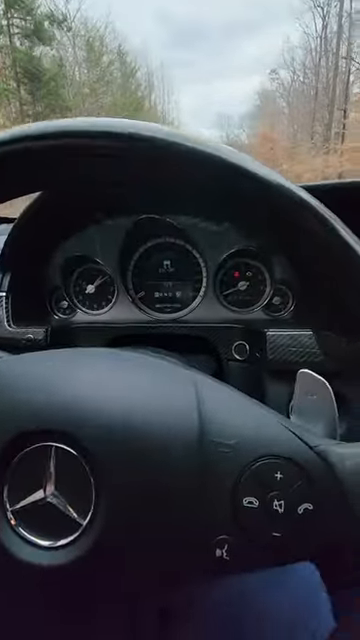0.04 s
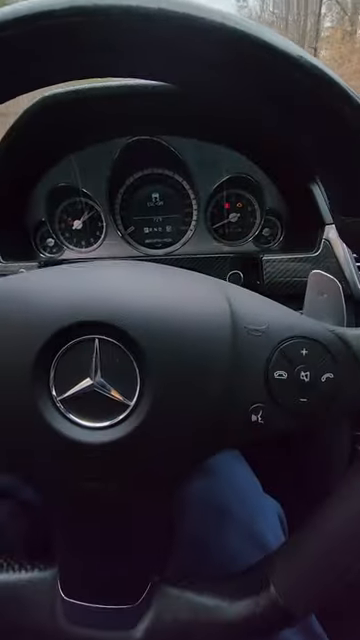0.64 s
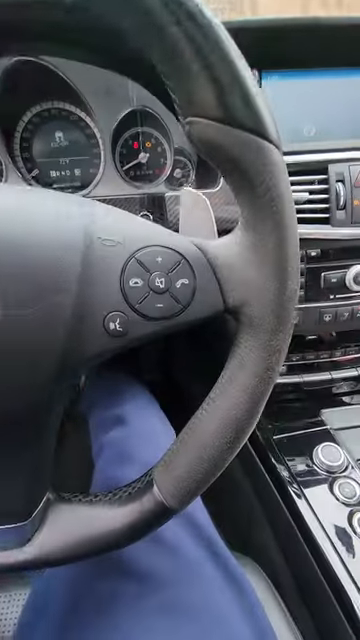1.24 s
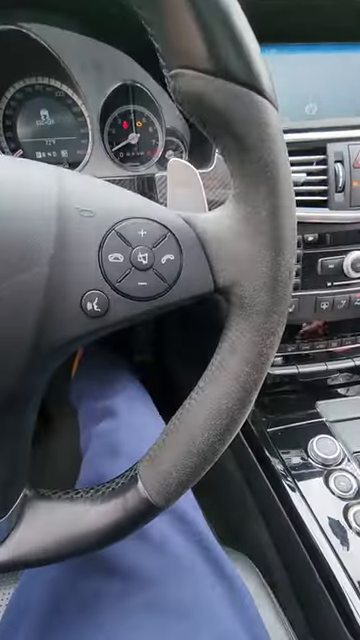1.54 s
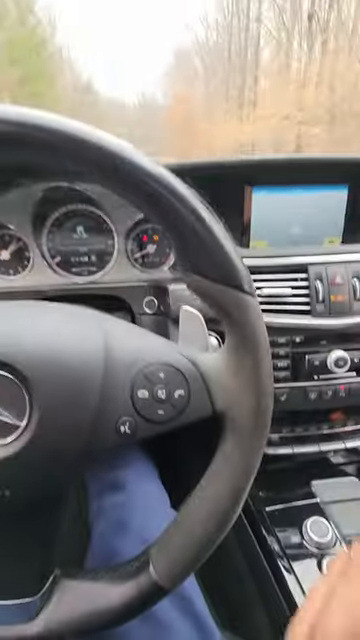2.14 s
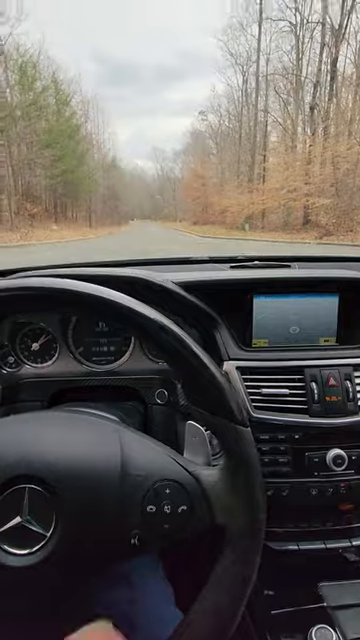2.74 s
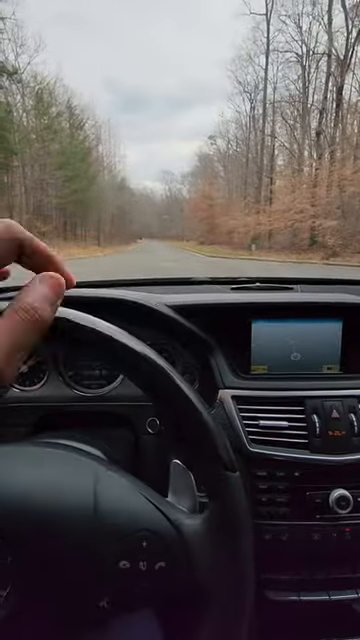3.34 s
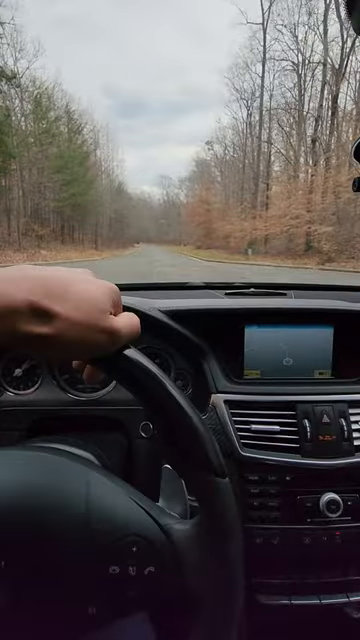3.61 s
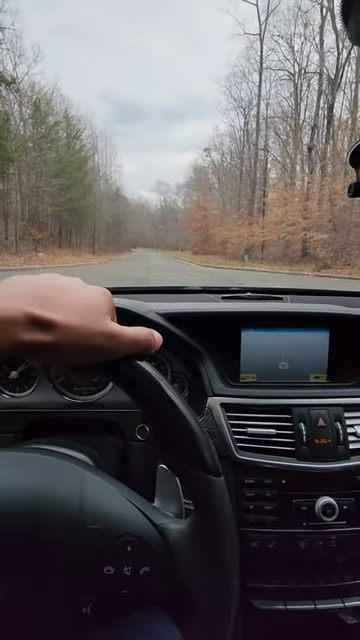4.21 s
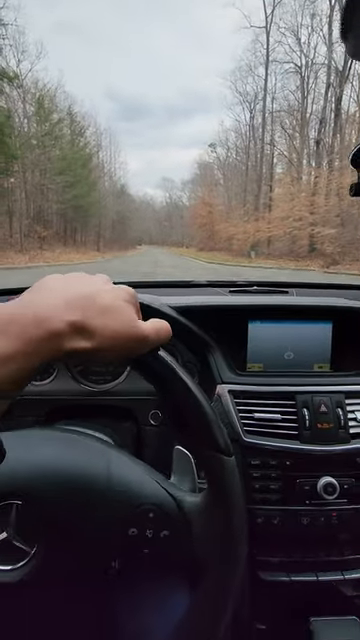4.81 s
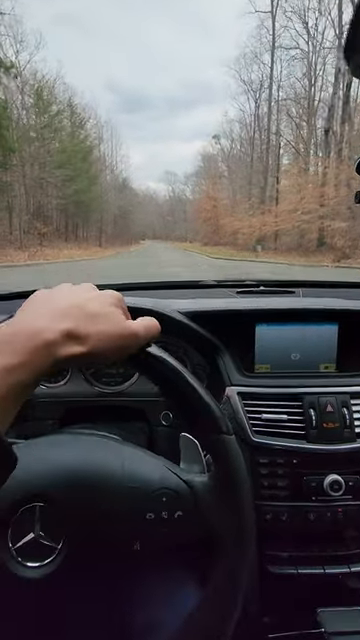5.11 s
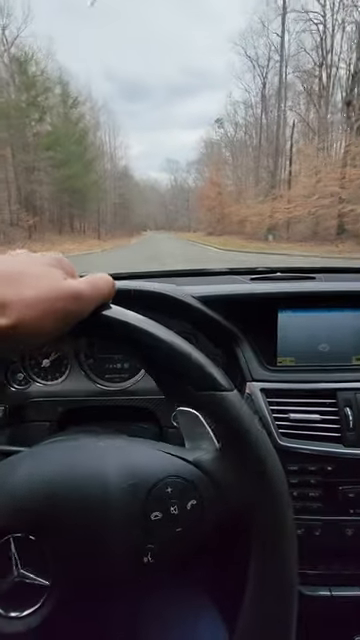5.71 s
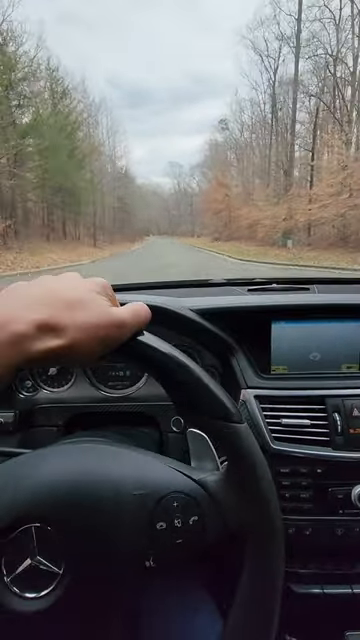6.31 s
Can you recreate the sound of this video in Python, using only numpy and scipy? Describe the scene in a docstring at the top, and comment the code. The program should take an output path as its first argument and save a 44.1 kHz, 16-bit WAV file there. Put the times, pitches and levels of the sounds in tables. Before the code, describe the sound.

Inside a car, a low idle and light knocks give way to hard revving, a brief tyre squeal and hissing wheelspin.

```python
"""Inside a V8 saloon, at the driver's seat. The engine idles while the driver handles a phone and clicks
switches, each impact ringing as a damped vibration. The throttle opens: the revs flare, the rear tyres
squeal by stick-slip friction and break loose, and the engine climbs to 6000 rpm over the broadband roar
of spinning rubber, then drops into the next gear. The engine's tones are orders: whole multiples of the
rate of its cycle (two crank turns), weighted by the resonances of exhaust and cabin."""
import sys
import numpy as np
from scipy import signal
from scipy.fft import rfft, irfft, next_fast_len
from scipy.io import wavfile
from scipy.ndimage import uniform_filter1d

SR = 44100
rng = np.random.default_rng(int(sys.argv[2]) if len(sys.argv) > 2 else 0)


def store_pcm(level_fs):
    """Save levels as 16-bit WAV."""
    pcm = np.round(np.clip(level_fs, -1, 1) * 32767).astype(np.int16)
    wavfile.write(sys.argv[1], SR, np.atleast_2d(pcm).T)


N = 284886
TIME = np.arange(N) / SR

# Engine speed. Each row: time in seconds, cycle rate in Hz.
IDLE_SPEED = [(0, 5.33), (2.3, 5.54), (2.75, 5.3), (3.1, 5.43), (3.5, 4.83), (3.85, 4.6), (4.05, 5.05),
              (4.25, 5.7), (4.5, 6.07)]
THROTTLE_SPEED = [(4.559, 7.6), (4.69, 13.45), (4.76, 17), (4.82, 22.6), (4.87, 24.3), (4.95, 23.2),
                  (5.03, 23.9), (5.11, 23), (5.3, 29.2), (5.6, 41.3), (5.77, 46.5), (5.89, 50.1),
                  (5.99, 48.8), (6.09, 50.7), (6.151, 45.2), (6.21, 37.4), (6.4, 34.8)]  # flare, bog, climb, gear change
# Low engine orders. Each row: order, strength in dB in the flare, at low revs and at high revs.
LOW_ORDERS = [(1, 3, 11, -2), (2, 5, 5, 1.5), (3, -3, -10, 2.5), (4, -9, 3.5, -8.5), (5, -5, 0.5, 13.5),
              (6, -1, -7.5, -1.5), (7, -3, 0.5, -6.5), (8, 8, 3, -1), (9, -9, -1.5, -14),
              (10, -3.5, -5.5, -6.5)]
# Tyre squeals. Each row: start and length in seconds, pitch in Hz, level in dB, overtone gain in dB.
SQUEALS = [(4.895, 0.14, 1057, -16.5, -12.5), (4.912, 0.03, 1200, -31.5, -18),
           (4.981, 0.051, 1187, -31, -21), (5.074, 0.035, 1030, -19, -18.5), (5.1, 0.03, 1250, -27.5, -27),
           (5.479, 0.031, 1028, -16.5, -28), (5.639, 0.029, 1028, -25, -33)]
# Surges of flung grit. Each row: centre and length in seconds, lift in dB.
GRIT_SURGES = [(5.86, 0.17, 3.5), (6.223, 0.12, 5.5)]
# Body shudders at wheelspin and gear change. Each row: centre and length in seconds, level in dB.
SHUDDERS = [(4.82, 0.29, -21), (6.18, 0.066, -20), (6.42, 0.17, -20.5)]
# Switches and trim. Each row: start in seconds, relative level in dB, ring time in seconds,
# tilt in dB per octave, left minus right in dB, pitch of the part in Hz.
CLICKS = [(.016, -27.5, 0.041, -9, -1, 2790), (.071, -28.5, 0.016, -10.5, 9, 820),
          (.2, -25, 0.0099, -11.5, 10.5, 870), (.4458, -21, 0.0083, -10.5, 11.5, 1000),
          (.658, -34, .0055, -9, 9, 2170), (.8453, -16, 0.0057, 1, 11, 2780),
          (.85, -24, 0.0036, -0.5, 10, 2400), (.879, -26.5, .0042, 1, 16, 5000),
          (.893, -28, 0.0058, -2, -7, 2400), (.911, -28, 0.0074, 2.5, 5, 2400),
          (1.445, -27, 0.033, 5.5, -1, 3370), (1.581, -34.5, 0.047, -.5, 2.5, 3190),
          (1.615, -35, .022, -3.5, 0, 2000), (1.638, -21.5, 0.045, 3.5, 0, 13400),
          (1.652, -25, .021, 7.5, -2, 11900), (1.917, -29, .012, -9, -3, 1850),
          (1.934, -27.5, .04, -1, 2.5, 2290), (1.965, -32.5, 0.031, .5, 1, 1800),
          (2.612, -28.5, 0.0059, 8.5, -4, 12300), (2.805, -7, 0.0046, -1.5, 8.5, 3420),
          (2.8925, -22, 0.011, -3.5, 8.5, 2750), (3.096, -34, 0.0087, -1.5, 4, 1840),
          (3.176, -45.5, .028, 4, -7, 13600), (3.587, -33, 0.019, -11.5, 5, 840),
          (3.739, -23, 0.0039, -5, 11.5, 2020), (3.787, -20.5, 0.0059, -1.5, -6, 2170),
          (3.795, -27, 0.0056, -6, 3, 1920), (3.897, -37, 0.011, -5, 11, 4800),
          (4.076, -42, 0.036, -5, 4, 4170), (4.435, -32, .033, -2.5, -2, 2400),
          (4.457, -26, 0.021, -3.5, 5, 2095), (4.71, -29, 0.036, -1.5, 0, 2260),
          (4.932, -27, .017, 1, 0, 7500), (5.046, -31, 0.046, 2.5, 6, 7800)]
# Knocks of hand, lever and pedal. Each row: start in seconds, relative level in dB,
# ring time in seconds, tilt in dB per octave.
KNOCKS = [(.003, -26, 0.31, -1.5), (0.061, -23.5, 0.11, -4), (1.621, -26.5, 0.18, -.5),
          (1.648, -23.5, 0.25, -6.5), (1.92, -25, 0.26, 1), (1.975, -27.5, 0.21, 0.5), (3.55, -28, 0.2, -8),
          (4.15, -29, .2, -9), (4.435, -25, .12, 0), (4.457, -17.5, 0.044, .5)]
# Handling tones. Each row: centre and length in seconds, frequency in Hz, level in dB.
PHONE_JOLTS = [(0.016, 0.078, 44, -21.5), (0.067, 0.05, 42.4, -13.5), (1.66, 0.048, 74, -28.5),
               (1.907, 0.045, 45, -22), (4.461, 0.019, 141, -18.5)]
LEATHER_SQUEAKS = [(0.015, 0.059, 2890, -52.5), (0.068, 0.008, 4900, -46.5), (4.517, 0.013, 4830, -57),
                   (4.686, 0.017, 4938, -58)]
# Skin and sleeve sliding. Each row: centre and length in seconds, level in dB.
RUBS = [(.048, .06, -56), (0.214, 0.2, -59), (0.44, 0.071, -59), (0.9, 0.27, -54.5), (1.643, 0.04, -42),
        (1.98, 0.15, -60), (2.564, 0.2, -56.5), (2.774, 0.17, -59), (2.982, 0.031, -57),
        (3.73, 0.051, -52.5), (3.882, 0.055, -57.5), (4.4, .12, -65), (4.7, 0.3, -62), (4.88, .12, -53.5)]
# Cabin hush. Each row: time in seconds, level in dB.
HUSH_LEVEL = [(0, -49.5), (1.2, -49), (2.2, -49), (2.7, -46.5), (3.5, -47), (4.4, -46.5)]
# The phone's two sound ports. Each row: frequency in Hz, left gain in dB, right gain in dB.
PORT_GAINS = [(1504, 0.5, 0.5), (2400, 1, 1.5), (4400, 2.5, 0), (6500, 3.5, -2), (7500, 8, 1), (8330, 3, 0),
              (9520, -5, -4), (11600, 0.5, 6.5), (14900, -1.5, 2.5)]

# Spectra of the sources and resonating parts. Each row: frequency in Hz, relative level in dB.
BOOM_SPECTRUM = [(24, -41), (36, -30.5), (50, -28), (66, -28), (82, -27.5), (104, -19), (150, -17),
                 (185, -23.5), (240, -35.5), (300, -33.5), (400, -29), (510, -25)]  # response of exhaust and cabin to the low orders
RASP_SPECTRUM = [(200, -24), (290, 7.5), (400, 3.5), (480, 4), (560, -5.5), (620, -3.5), (700, -3.5),
                 (780, 4), (900, -6), (1300, -14), (1900, -24)]
GAS_SPECTRUM = [(25, -1), (45, -3), (90, 0.5), (170, -4), (260, 6), (470, 4), (570, 6), (820, -0.5),
                (1000, -4)]
ROAR_SPECTRUM = [(700, 2.5), (1150, -1), (1400, -6.5), (1650, -4.5), (2100, -4.5), (2800, -13.5),
                 (4500, -20), (8000, -39)]
GRIT_SPECTRUM = [(1500, -26.5), (3000, -16), (4500, -1.5), (7400, 0), (11000, -3.5), (16000, -6.5)]
SCRUB_SPECTRUM = [(900, -15), (1000, -14), (1045, -1), (1090, -6), (1200, -19.5)]
TEAR_SPECTRUM = [(1900, -17), (2200, 8.5), (2700, -6.5), (3100, 1.5), (3700, -8), (4800, -9), (7000, -32)]
RUMBLE_SPECTRUM = [(24, -3), (38, 5), (55, -1), (80, 7.5), (140, -3), (190, 7.5), (250, -11), (320, -4),
                   (420, -16.5)]
SHUDDER_SPECTRUM = [(24, 1), (38, 6.5), (55, -5), (80, -3), (190, -12), (300, -12)]
MUTTER_SPECTRUM = [(60, -7.5), (80, 0), (100, -6.5), (135, 4.5), (170, -7), (205, -6), (260, -33.5),
                   (330, -40)]
IDLE_SHUDDER_SPECTRUM = [(22, -9), (38, 7), (60, 5.5), (130, -10.5), (220, -14.5)]
CLICK_SPECTRUM = [(300, -27), (900, -4.5), (1700, -2.5), (2800, 1.5), (4000, -1.5), (5200, 0), (7400, -4.5),
                  (9500, -7.5), (12500, -0.5), (16000, -2.5)]
KNOCK_SPECTRUM = [(40, -3.5), (80, 4.5), (140, 3.5), (220, -15), (310, -1), (400, -16.5), (490, -12.5),
                  (620, -22.5), (820, -17), (1500, -21.5), (4000, -38)]
RUB_SPECTRUM = [(300, -6), (1500, 5.5), (4500, 3), (7500, -3.5), (12000, -0.5), (16000, -3.5)]
HUSH_SPECTRUM = [(120, -3), (210, -5.5), (280, -10.5), (400, -15), (520, -16.5), (830, -15.5), (1400, -21),
                 (2800, -34), (4500, -35), (7400, -39.5), (12000, -45.5), (16000, -43.5)]

FLARE_HZ, LOW_REVS_HZ, HIGH_REVS_HZ = 15.5, 26.16, 49.3  # engine cycle rates
THROTTLE_S, THROTTLE_RISE_S, SLIP_S = 4.52, 0.058, 4.82


def engine_throb(cycle_hz, phase):
    """Forced resonance: the low orders swell and fade as they sweep through exhaust and cabin modes."""
    throb = 0
    for order, *strengths_db in LOW_ORDERS:
        k = round(order)
        strength_db = np.interp(cycle_hz, [FLARE_HZ, LOW_REVS_HZ, HIGH_REVS_HZ], strengths_db)
        gain = undb(strength_db + 1.333 * walk(12.78)) * response(BOOM_SPECTRUM, k * cycle_hz)
        # the pipes smear each cycle's pulse by an amount that wanders
        stray_rad = 0.9 if k in (1, 6, 9, 10) else 0.18
        throb += gain * np.sin(k * phase + 0.195 * k * k + stray_rad * walk(9))
    unevenness = np.minimum(3.5 / cycle_hz, 0.16)  # firings differ most at low revs
    return throb * (1 + unevenness * walk(110))


def exhaust_rasp(cycle_hz, phase):
    """Pulsating flow: exhaust pulses give a series of high harmonics, rushing gas a band of noise."""
    rasp = 0
    for k in range(11, 44):
        bank_gain = undb(4.3 * (k % 5 == 0))  # each bank fires unevenly, lifting every fifth order
        gain = bank_gain * response(RASP_SPECTRUM, k * cycle_hz)
        rasp += gain * (1 + 0.43 * walk(7)) * partial(phase, k)
    rasp /= np.sqrt(uniform_filter1d(rasp ** 2, size=8000) + 1e-9)  # hold the running rms at 1
    gas = undb(-6) * noise(GAS_SPECTRUM) * (1 + 0.3 * np.sin(3 * phase))
    octaves = np.log2(cycle_hz / LOW_REVS_HZ)
    speed_db = 3.2 * octaves + 13.5 * np.minimum(octaves, 0)
    climb_hz_per_s = np.maximum(np.gradient(cycle_hz) * SR, 0)
    bark_db = 3 * swell(4.795, 0.054)  # at the top of the flare
    return undb(-32.5 + speed_db + 0.0741 * climb_hz_per_s + bark_db) * (rasp + gas)


def wheelspin(cycle_hz, phase, wheel_lag_s=0.04, scrub_peak_s=5.73, free_spin_s=5.385):
    """Sliding friction: rubber roars, rings and tears; flung grit hisses louder with wheel speed."""
    roar = noise(ROAR_SPECTRUM) * undb(-31 + walk(55) + 0.44 * walk(17))
    roar *= 1 + 0.084 * np.sin(2 * phase)  # pulses once a crank turn
    roar *= undb(-4 * (1 - rise(5.08, 0.082)))  # softer while the tread still catches
    wheel_octaves = np.log2(np.interp(TIME - wheel_lag_s, TIME, cycle_hz) / LOW_REVS_HZ)
    surge_db = sum(db * swell(s, length) for s, length, db in GRIT_SURGES)
    grit_db = -50 + 8.5 * wheel_octaves + surge_db
    grit = noise(GRIT_SPECTRUM) * undb(grit_db + walk(43) + 1.5 * walk(900))
    scrub_db = -27.5 - 14 * np.abs(TIME - scrub_peak_s)
    scrub = noise(SCRUB_SPECTRUM) * undb(scrub_db + 1.5 * walk(70) + 3.1 * walk(24))
    tear_db = -42 - 60 * np.maximum(TIME - free_spin_s, 0)
    tear = noise(TEAR_SPECTRUM) * undb(tear_db + 2 * walk(120))
    bite = undb(6 * swell(4.91, 0.052))  # harsh as the tyres first slip
    return rise(SLIP_S, 0.016) * grit + rise(SLIP_S, 0.091) ** 2 * (scrub + (roar + tear) * bite)


def tyre_squeal(settle_s=0.012, sag_s=0.15, attack_s=0.015, release_s=0.01, right_lead_rad=0.74):
    """Stick-slip oscillation: the tread's wavering tones start sharp and sag as the grip goes."""
    out = 0
    wobble = 1 + 0.00916 * walk(254)
    second, third = undb(2 * walk(25)), undb(-18) * (1 + 0.65 * walk(200))
    for start, length, hz, db, overtone_db in SQUEALS:
        age = np.maximum(TIME - start, 0)
        bend = 1 + 0.045 * np.exp(-age / settle_s) - 0.058 * np.minimum(age / sag_s, 1) ** 3
        phase = 2 * np.pi * np.cumsum(hz * bend * wobble) / SR + np.array([[0], [right_lead_rad]])
        envelope = rise(start, attack_s) * np.exp(-np.clip((age - length) / release_s, 0, 50))
        harshness = 0.49 + 1.13 * rise(start, length)  # grows as the tread holds on
        overtones = harshness * (second * np.sin(2 * phase) + third * np.sin(3 * phase))
        out += undb(db) * envelope * (np.sin(phase) + undb(overtone_db) * overtones)
    flutter_db = 0.54 * walk(150) + 0.37 * walk(450) + 0.57 * walk(25)
    return np.sqrt(2) * out * undb(flutter_db)


def body_shake(phase, throttle):
    """Forced vibration: the body rumbles, surging once an engine cycle, and gives a few deep shudders."""
    rumble = undb(-28.5) * noise(RUMBLE_SPECTRUM) * (1 + 0.57 * np.cos(phase))
    return throttle * rumble + noise(SHUDDER_SPECTRUM) * swells(SHUDDERS)


def engine_idle(cycle_hz, phase):
    """Beats: firings boom at order 8; orders 6 and 10, from the uneven banks, beat with it each turn."""
    load = rise(3.995, 0.16)  # the engine pulls against the brake
    stumble_db = 14 * np.maximum(5.006 - cycle_hz, 0)  # the boom fades when the speed sags
    boom = sum(undb(db + 0.5 * walk(5)) * np.cos(k * phase) for k, db in [(6, -8), (8, 0), (10, -17)])
    mutter = sum(response(MUTTER_SPECTRUM, k * cycle_hz) * (1 + 0.5 * walk(2.1)) * partial(phase, k)
                 for k in range(12, 52))
    shudder = undb(-3) * noise(IDLE_SHUDDER_SPECTRUM)
    boom = undb(-32.5 + 6 * load - stumble_db) * unit(boom)
    mutter = undb(-43.5 + 9 * load) * (unit(mutter) + shudder)
    return (1 - rise(THROTTLE_S, 0.18)) * (boom + mutter)


def switch_clicks(size=4096, tail_t60=0.066):
    """Impact excitation: an impulse, brief chatter and the plastic part's damped note, with a cabin tail."""
    out, t = np.zeros((2, N)), np.arange(size) / SR
    for start, db, t60, tilt_db, pan_db, hz in list(CLICKS) + trim_ticks():
        decay, tail = undb(-60 * t / t60), undb(-29 - 60 * t / tail_t60)
        push = rng.standard_normal((2, size)) * (decay + tail)
        push[0] += 0.62 * decay * np.sin(2 * np.pi * hz * t)
        push[0, 0] += 7  # the sharp edge
        snap = ring(push, CLICK_SPECTRUM, tilt_db, t60, size=8192)
        add(out, start, snap * undb(db - 12.5 + np.array([[pan_db], [-pan_db]]) / 2))
    return out


def trim_ticks(per_s=3):
    """Random point process: faint ticks of trim and fingers, returned as rows like those of CLICKS."""
    draws = rng.random((round(per_s * N / SR), 4))
    return [(when * TIME[-1], -49 + 5 * (force - 0.5), 0.012, 8 * (bright - 0.5), 8 * (side - 0.5), 3500)
            for when, force, bright, side in draws]


def knocks(size=8192):
    """Damped vibration: soft blows excite the low resonances of the dashboard and the phone."""
    out, t = np.zeros((2, N)), np.arange(size) / SR
    for start, db, t60, tilt_db in KNOCKS:
        push = rng.standard_normal((2, size)) * undb(-60 * t / t60)
        add(out, start, ring(push, KNOCK_SPECTRUM, tilt_db, t60, size=16384) * undb(db - 7.5))
    return out


def phone_jolts():
    """Structure-borne sound: each shift of grip sends a few deep swings through the phone."""
    return sum(-np.sqrt(2) * undb(db) * swell(s, length) * np.cos(2 * np.pi * hz * (TIME - s))
               for s, length, hz, db in PHONE_JOLTS)


def rubs():
    """Friction: sliding skin and cloth give grainy noise, leather under the fingers tiny squeaks."""
    squeaks = 0
    for centre, length, hz, db in LEATHER_SQUEAKS:
        phase = 2 * np.pi * hz * TIME + 1.8 * walk(300)
        squeaks += undb(db) * swell(centre, length) * partial(phase, 0.96)  # 4 % below the listed pitch
    return noise(RUB_SPECTRUM) * swells(RUBS) * undb(2.1 * walk(60) + 2 * walk(700)) + squeaks


def cabin_hush():
    """Ambient noise: air and engine bay fill the closed car with a slowly drifting broadband hush."""
    return noise(HUSH_SPECTRUM) * undb(curve(HUSH_LEVEL) + 0.6 * walk(5))


def undb(db):
    """The decibel law: level to amplitude ratio."""
    return 10 ** (np.asarray(db) / 20)


def unit(x):
    """Normalisation to rms 1."""
    return x / np.sqrt(np.mean(x ** 2))


def curve(table):
    """Linear interpolation of (seconds, value) rows over time."""
    return np.interp(TIME, *np.transpose(table))


def rise(start_s, rise_s):
    """Linear ramp from 0 to 1."""
    return np.clip((TIME - start_s) / rise_s, 0, 1)


def swell(centre_s, length_s):
    """Gaussian envelope of height 1."""
    return np.exp(-np.minimum((2 * (TIME - centre_s) / length_s) ** 2, 50))


def swells(table):
    """Sum of Gaussian envelopes, one for each (centre, length, dB) row."""
    return sum(undb(db) * swell(s, length) for s, length, db in table)


def walk(rate_hz):
    """Random modulation: noise of rms 1, low-passed at the given rate."""
    f = np.arange(N // 2 + 1) * SR / N
    return unit(irfft(rfft(rng.standard_normal(N)) / (1 + (f / rate_hz) ** 4), N))


def partial(phase, order):
    """Sinusoid of rms 1 at a multiple of the given phase, with a random offset."""
    return np.sqrt(2) * np.sin(order * phase + rng.uniform(0, 2 * np.pi))


def response(spectrum, hz):
    """Frequency response: gain interpolated in dB over log frequency."""
    f, db = np.transpose(spectrum)
    return undb(np.interp(np.log(hz + 1e-9), np.log(f), db))


def stereo(mid, side, hz, apart_hz=1500):
    """Spatial coherence: left and right spectra are alike in the bass and differ in the treble."""
    width = 1.375 * hz / np.hypot(hz, apart_hz)
    return (mid + np.array([[1], [-1]]) * width * side) / np.hypot(1, width)


def noise(spectrum):
    """Diffuse field: stereo noise of rms 1, falling away beyond the ends of its spectrum."""
    f = np.arange(N // 2 + 1) * SR / N
    skirts = np.minimum(f / spectrum[0][0], 1) ** 2 * np.minimum(spectrum[-1][0] / (f + 1), 1) ** 2
    white = stereo(*rfft(rng.standard_normal((2, N))), f)
    return unit(irfft(white * response(spectrum, f) * skirts, N))


def ring(push, spectrum, tilt_db, t60, size):
    """Minimum-phase response of a body to a mid and side push, with energy proportional to ring time."""
    f = np.arange(size // 2 + 1) * SR / size + 1
    low_hz, high_hz = spectrum[0][0], spectrum[-1][0]
    gain = response(spectrum, f) * undb(tilt_db * np.log2(np.maximum(f, low_hz)))
    gain /= (1 + (low_hz / 2 / f) ** 2) * (1 + (f / high_hz / 2) ** 2)
    cepstrum = irfft(np.log(gain))
    cepstrum[1:size // 2] *= 2  # folding the cepstrum makes the response causal
    cepstrum[size // 2 + 1:] = 0
    sound = irfft(stereo(*rfft(push, size), f) * np.exp(rfft(cepstrum)))
    return sound * np.sqrt(t60 * SR / np.sum(sound ** 2))


def add(out, start_s, sound):
    """Superposition of a sound from a given time."""
    i = max(int(start_s * SR), 0)
    out[:, i:i + sound.shape[1]] += sound[:, :N - i]


def scene():
    """Superposition: one crankshaft drives engine, body and wheelspin; handling and hush add to them."""
    cycle_hz = curve(list(IDLE_SPEED) + list(THROTTLE_SPEED))
    cycle_hz = uniform_filter1d(cycle_hz, size=1500)  # the flywheel rounds every change of speed
    phase = 2 * np.pi * np.cumsum(cycle_hz * (1 + 0.002 * walk(25.93))) / SR
    throttle = rise(THROTTLE_S, THROTTLE_RISE_S)
    engine = engine_idle(cycle_hz, phase)
    engine += throttle * (engine_throb(cycle_hz, phase) + exhaust_rasp(cycle_hz, phase))
    engine += body_shake(phase, throttle)
    engine *= undb([[0.5], [-0.5]])  # slightly to the left
    tyres = wheelspin(cycle_hz, phase) + tyre_squeal()
    return engine + tyres + knocks() + phone_jolts() + rubs() + cabin_hush() + switch_clicks()


def record(dry, low_cut_hz=16, high_cut_hz=15900):
    """Linear filtering: each port colours the treble; the phone thins the deepest bass and cuts the top."""
    size = next_fast_len(N + 4096)
    f = np.arange(size // 2 + 1) * SR / size
    colour = [response(np.array(PORT_GAINS)[:, [0, side]], f) for side in (1, 2)]
    heard = irfft(rfft(dry, size) * colour, size)[:, :N]
    thinned = signal.sosfilt(signal.butter(2, low_cut_hz, "high", fs=SR, output="sos"), heard)
    return signal.sosfilt(signal.ellip(10, 0.2, 80, high_cut_hz, fs=SR, output="sos"), thinned)


dry = scene()
out = record(dry)
store_pcm(out)
```